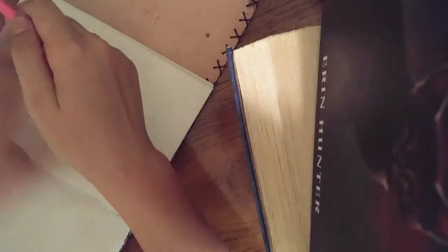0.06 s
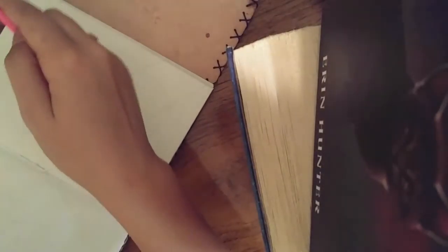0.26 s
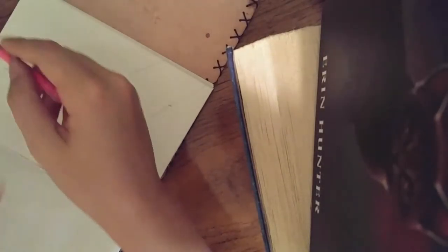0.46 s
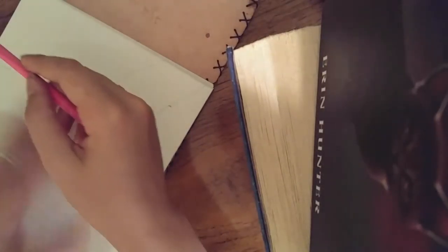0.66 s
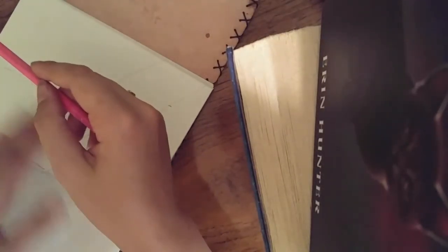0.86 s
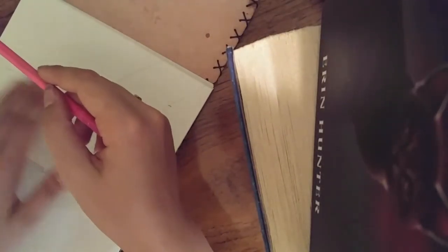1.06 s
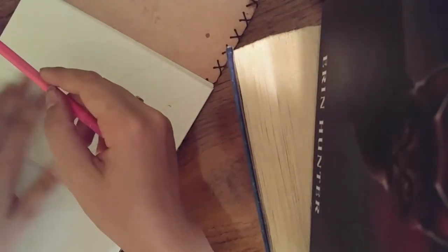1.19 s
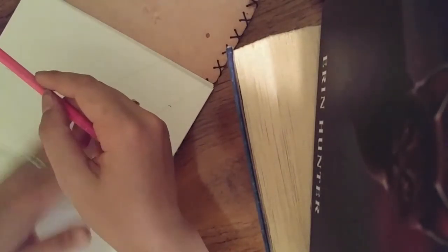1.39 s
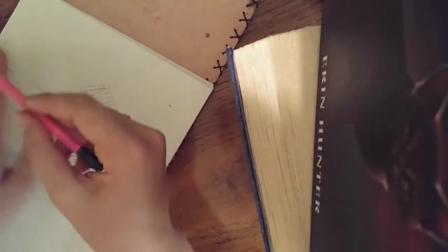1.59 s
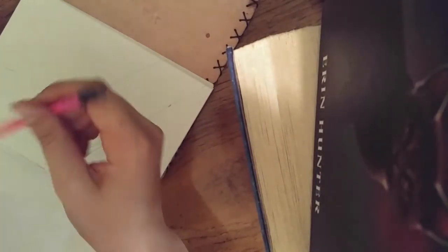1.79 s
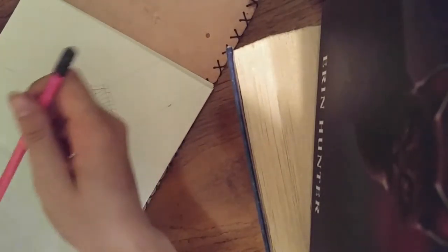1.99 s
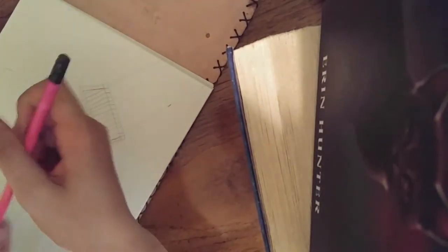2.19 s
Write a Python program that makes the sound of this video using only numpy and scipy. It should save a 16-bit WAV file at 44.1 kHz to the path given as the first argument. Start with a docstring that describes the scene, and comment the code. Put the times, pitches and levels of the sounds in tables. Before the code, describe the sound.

Close pencil sketching on paper: a few quick, scratchy strokes and soft taps.

```python
"""In a small quiet room, a pencil close by draws seven short strokes in a sketchbook on a wooden table.
The lead catches on the paper fibres, making a fine hiss that swells with the speed of the hand.
Where it lands it taps the page and thumps the table. The lead squeaks once, and the hand nudges
the book once. A low hum and a faint hiss lie underneath."""
import sys
import numpy as np
from scipy import signal
from scipy.fft import rfft, irfft
from scipy.io import wavfile
from scipy.ndimage import uniform_filter1d

SR = 44100
rng = np.random.default_rng(int(sys.argv[2]) if len(sys.argv) > 2 else 0)


def store_pcm(level_fs):
    """Save levels as 16-bit WAV."""
    pcm = np.round(np.clip(level_fs, -1, 1) * 32767).astype(np.int16)
    wavfile.write(sys.argv[1], SR, np.atleast_2d(pcm).T)


N = 99225

TOUCH_S, LIFT_S, CHATTER_S = 0.0016, 0.013, 0.0055
CHATTER_DB, BODY_DB = 0.5, -19
# Two bands of pencil rasp, and a narrow high ring near 10 kHz, probably the microphone's,
# varying in strength per stroke (centre [Hz], width [octaves])
RASP, BITE, HIGH_RING = (2400, 0.81), (4600, 0.44), (10050, 0.08)
# The hiss of lead on paper (frequency [Hz], level [dB])
LEAD_HISS = [(300, -50), (1200, -22.5), (2000, -12), (2600, -14), (3400, -9.5), (4500, -7), (5600, -6.5),
             (6500, -7.5), (8000, -5.5), (8900, -9), (9500, -3.5), (10150, -2), (10900, -4.5), (12500, -8),
             (15500, -10.5), (17000, -16)]
# The page drumming under the lead (frequency [Hz], level [dB])
PAGE_BODY = [(40, -24), (100, 1), (200, -15.5), (330, -11.5), (500, -24), (620, -4.5), (850, -2),
             (1100, -4.5), (1450, -9.5), (2200, -17.5), (5000, -31)]
# The pencil strokes (start [s], speeding up [s], slowing down [s], level [dB], change at touch [dB],
# change at lift [dB], brightness [dB/octave], page body [dB], rasp [dB], bite [dB], high ring [dB],
# left minus right [dB])
STROKES = [(0.1926, .034, 0.075, -30.5, -6, -7, 1.8, 0, -5, 0, 0.5, -1.5),
           (0.7143, 0.088, 0.025, -35.5, -10.5, -2, 1.5, 0.5, 0, 0.5, 1.5, -0.5),
           (1.082, 0.0061, 0.035, -60.5, 5, -2, 0, 15, 4, -1, 2.5, -1),
           (1.146, .030, 0.043, -51, -8.5, -4.5, 2.9, 11, 2.5, 0.5, 2.5, -1),
           (1.268, 0.059, 0.048, -49.5, -9.5, -9, 0.5, 8, 0.5, -1.5, 0.5, -1),
           (1.414, 0.076, 0.038, -40, -13.5, -8, -1.26, 2, -3, -1.5, 2, -1),
           (1.753, 0.026, 0.068, -34, -9, -3, 1.75, -2.5, -2, 2, 2, -1)]
def stroke(start, speed_up, slow_down, db, touch_db, lift_db, tilt_db,
           body_db, rasp_db, bite_db, high_ring_db, pan_db):
    """The lead rubs the paper: the hiss swells and eases with the hand, then dies as the lead lifts."""
    t = np.arange(SR // 3) / SR
    swell_db = touch_db * np.maximum(1 - t / speed_up, 0) ** 2
    ease_db = lift_db * np.clip((t - speed_up) / slow_down, 0, 1) ** 2
    contact = np.minimum(t / TOUCH_S, 1) * np.exp(-np.maximum(t - speed_up - slow_down, 0) / LIFT_S)
    chatter = unit(uniform_filter1d(rng.standard_normal(len(t)), int(CHATTER_S * SR)))
    hiss = colour(fibre_catches(len(t)), LEAD_HISS, tilt_db)
    for band, band_db in (RASP, rasp_db), (BITE, bite_db), (HIGH_RING, high_ring_db):
        hiss = bump(hiss, band, band_db)
    hiss = unit(hiss) * amp([[pan_db / 2], [-pan_db / 2]])
    body = amp(BODY_DB + body_db) * unit(colour(fibre_catches(len(t)), PAGE_BODY))
    return start, (hiss + body) * contact * amp(db + swell_db + ease_db + CHATTER_DB * chatter)


CATCHES_PER_S, CATCH_SPREAD_DB = 26000, 2.0
# How alike the pencil sounds on the left and right (frequency [Hz], likeness [0-1])
PENCIL_LIKENESS = [(100, 1), (400, 0.76), (700, 0.63), (1150, 0.56), (1450, .45), (2300, 0.93), (3100, .45),
                   (3750, 0.97), (4600, 0.42), (5600, 0.083), (8500, 0.022), (11000, 0.12), (14000, 0.66),
                   (16000, .3)]
def fibre_catches(size):
    """Paper fibres let go of the lead in a crowd of tiny, uneven clicks."""
    strength = amp(CATCH_SPREAD_DB * np.minimum(rng.exponential(1, size), 4))
    caught = rng.random(size) < CATCHES_PER_S / SR
    return pair(strength * caught * rng.standard_normal((2, size)), PENCIL_LIKENESS)


TICK_S, TAP_RISE_S, THUMP_RISE_S = 0.0064, 0.00083, 0.0016
PUFF_S, PUFF_DB = 0.005, 3
# The puff of the sheet being knocked flat (frequency [Hz], level [dB])
PAGE_PUFF = [(60, -4), (200, -1.5), (350, -20), (500, -23), (650, 0.5), (900, 6), (1150, -11), (1500, -10),
             (2300, -20.5), (4500, -8.5), (12000, -36)]
# The ringing tones of page and table (pitch [Hz], level [dB], time to fade by 60 dB [s])
PAGE_TONES = [(437.5, -12, 0.13), (616.5, -0.5, 0.056), (730, 1, 0.0081), (800, -5, 0.033),
              (883, -10, 0.056), (1090, -4, 0.021), (1169, -5, 0.072), (1315, -10, 0.04), (1910, -9, 0.043),
              (2346, -19, 0.041)]
TABLE_TONES = [(63.8, 0.5, 0.35), (105, 1, 0.24), (123.4, 3.5, 0.17), (163.7, -2.5, 0.33), (197, -2, 0.15),
               (227, -19.5, 0.19), (297, -23, 0.12)]
# The pencil's knocks (time [s], page tap [dB], table thump [dB], brightness [dB/octave], tick [dB])
TAPS = [(0.1916, -47.5, -59, 5, -42), (.205, -35.5, -34, 1.5, -55), (.299, -50.5, -82, 0, -35.5),
        (0.7156, -39.5, -55, 0, -48.5), (0.819, -47, -76, -0.5, -55), (1.085, -59, -84, -11, -57),
        (1.42, -53, -67, 3.5, -70), (1.512, -54, -82, 13, -63), (1.756, -40.5, -70, -1, -40),
        (1.7634, -27, -30.5, -4, -46)]
def tap(start, page_db, table_db, tilt_db, tick_db):
    """The tip hits with a tick, the sheet flattens with a puff, and page and table ring."""
    t = np.arange(SR // 2) / SR
    tick = unit(colour(fibre_catches(len(t)), LEAD_HISS)) * np.exp(-t / TICK_S)
    puff = unit(colour(fibre_catches(len(t)), PAGE_PUFF, tilt_db))
    puff *= np.exp(-t / PUFF_S) * np.minimum(t / TAP_RISE_S, 1)
    page = ring(PAGE_TONES, t, TAP_RISE_S, tilt_db) + amp(PUFF_DB) * puff
    thump = ring(TABLE_TONES, t, THUMP_RISE_S)
    return start, amp(tick_db) * tick + amp(page_db) * page + amp(table_db) * thump


def ring(tones, t, rise_s, tilt_db=0):
    """A struck object rings with several tones, each fading at its own pace."""
    hz, db, fade_s = np.transpose(tones)[:, :, None]
    gain = amp(db + tilt_db * np.log2(hz / hz[0]))
    waves = gain * np.exp(-np.log(1000) * t / fade_s) * np.sin(2 * np.pi * hz * t)
    return waves.sum(0) / np.linalg.norm(gain) * (1 - np.exp(-t / rise_s))


# The lead's one squeak (time [s], length [s], level [dB], starting pitch [Hz], rise [octaves])
SQUEAKS = [(0.238, 0.0118, -47, 1748, 0.24)]
def squeak(start, length, db, hz, octaves):
    """For a moment the lead sticks and slips, faster and faster."""
    progress = np.arange(0, length, 1 / SR) / length
    tone = np.sin(2 * np.pi * np.cumsum(hz * 2 ** (octaves * progress)) / SR)
    return start, amp(db) * np.sin(np.pi * progress) ** 2 * tone


# The hand settling on the book (time [s], level [dB], pitch [Hz])
NUDGES = [(0.763, -54.5, 62)]
def nudge(peak_time, db, hz, width_s=0.019):
    """A soft push of the hand rocks the table a few times."""
    t = np.arange(-SR // 8, SR // 8) / SR
    return peak_time + t[0], amp(db) * np.exp(-(t / width_s) ** 2) * np.sin(2 * np.pi * hz * t)


# How much louder the left side is (frequency [Hz], left minus right [dB])
LEFT_LOUDER = [(60, 1.8), (150, 1.2), (300, 5), (600, 0), (1100, 9.5), (2500, 6), (4300, 3), (6000, 6),
               (8400, 12.5), (10000, 13), (12000, 6), (15500, 8)]
# How far ahead the wave is on the left (frequency [Hz], head start [radians])
LEFT_SOONER = [(60, .02), (300, 0.13), (550, 0.48), (1150, 0.23), (1600, 0.43), (4000, 0.45), (5000, 0.9),
               (10000, .7), (14000, 1)]
def from_left(x, share=1):
    """Sound reaches the left microphone louder and sooner; share scales the loudness gap."""
    hz, sides = bins(x), np.array([[.5], [-.5]])
    gain = amp(share * sides * read(LEFT_LOUDER, hz)) * np.exp(1j * sides * read(LEFT_SOONER, hz))
    return irfft(rfft(x) * gain / np.linalg.norm(gain, axis=0), N)


LATE_DB, LATE_TIMES_LONGER = -24.5, 2.67
# How long the quick echoes last (frequency [Hz], time to fade by 60 dB [s])
ECHO_FADE = [(100, 0.18), (500, 0.22), (2000, 0.35), (6000, 0.27), (10000, 0.18), (16000, 0.21)]
# How loud the echoes are (frequency [Hz], level [dB])
ECHO_LEVEL = [(60, -25), (300, -3), (1000, -7.5), (4000, -7), (16000, 1)]
def room_echo(x):
    """Sound bounces quickly off the table and walls, then leaves a faint longer tail."""
    bounces = pair(rng.standard_normal((2, SR)), PENCIL_LIKENESS) * (np.arange(SR) > SR // 400)
    hz, t, spectrum = signal.stft(bounces, SR, nperseg=256)
    fall_db = -60 * t / read(ECHO_FADE, hz)[:, None]
    fade = amp(fall_db) + amp(LATE_DB + fall_db / LATE_TIMES_LONGER)
    tail = signal.istft(spectrum * fade, SR, nperseg=256)[1]
    echoes = signal.fftconvolve(x, tail / np.linalg.norm(tail[0]), axes=1)[:, :N]
    return colour(echoes, ECHO_LEVEL)


# The tones of the hum (pitch [Hz], base level [dB], loudness wobble [0-1], pitch drift [Hz])
HUM_TONES = [(55.5, -73, 0.8, 2.7), (114.6, -70.5, 0.4, 5.04), (202, -86.5, 0.7, 6),
             (290, -88.5, 0.2, 1.86)]
# The rise and fall of the whole hum (time [s], level change [dB])
HUM_SWELL = [(0, 6), (0.101, -1), (.43, 8.5), (.49, -3.5), (0.582, 2.5), (.95, 5.5), (1.06, -5.5), (1.2, 8),
             (1.33, 1.5), (1.4, 5), (1.62, 1), (2.25, 2.5)]
def hum():
    """Four low tones waver in loudness and pitch."""
    tones = np.zeros(N)
    for hz, db, depth, drift in HUM_TONES:
        wobble = 1 + depth * waver()
        pitch = hz + drift * waver()
        tones += amp(db) * unit(wobble * np.sin(2 * np.pi * np.cumsum(pitch) / SR))
    return tones * amp(np.interp(np.arange(N) / SR, *np.transpose(HUM_SWELL)))


# The hiss of the room (frequency [Hz], level [dB])
AIR_HISS = [(25, -23), (45, -17), (60, -7.5), (85, -4), (120, -6), (150, -10), (229, -16), (317, -19),
            (400, -18), (490, -28.5), (624, -16), (887, -15), (1100, -19), (1740, -24), (4500, -26),
            (7510, -30), (14400, -28), (16000, -33)]
# How alike that hiss is on the left and right (frequency [Hz], likeness [0-1])
AIR_LIKENESS = [(100, 0.84), (400, 0.42), (1000, 0.47), (3000, 0.34), (15000, 0.26)]
def room_air(db=-67):
    """The air in the room makes a faint, steady noise."""
    return amp(db) * unit(colour(pair(rng.standard_normal((2, N)), AIR_LIKENESS), AIR_HISS))


def waver(speed_hz=6.17):
    """A slow random wander with a typical size of 1."""
    noise = rng.standard_normal(N)
    return unit(irfft(rfft(noise) * np.exp(-(bins(noise) / speed_hz) ** 2), N))


def amp(db):
    """Turns decibels into a number to multiply by."""
    return 10 ** (np.asarray(db) / 20)


def unit(x):
    """Scales a sound to an average power of 1."""
    return x / np.sqrt(np.mean(x ** 2) + 1e-20)


def bins(x):
    """Lists the frequencies that make up x."""
    return np.fft.rfftfreq(x.shape[-1], 1 / SR)


def read(points, hz):
    """Reads between the rows of a table, spacing frequencies by octaves."""
    row_hz, value = np.transpose(points)
    return np.interp(np.log(hz + 1), np.log(row_hz + 1), value)


def colour(x, points, tilt_db=0):
    """Shapes lows and highs by a table, adding tilt_db for each octave up."""
    hz = bins(x)
    octaves = np.log2(np.maximum(hz / points[0][0], 1))
    return irfft(rfft(x) * amp(read(points, hz) + tilt_db * octaves), x.shape[-1])


def bump(x, band, db):
    """Turns one band of frequencies up or down."""
    hz, octaves = band
    hill = np.exp(-(np.log2((bins(x) + 1) / hz) / octaves) ** 2)
    return irfft(rfft(x) * amp(db * hill), x.shape[-1])


def pair(x, likeness):
    """Blends two unrelated sounds into a partly alike left and right."""
    left, other = rfft(x)
    alike = np.clip(read(likeness, bins(x)), -1, 1)
    right = alike * left + np.sqrt(1 - alike ** 2) * other
    return irfft(np.array([left, right]), x.shape[-1])


def add(mix, start, sound):
    """Lays a sound into the mix at a start time in seconds."""
    part = mix[:, max(round(start * SR), 0):][:, :sound.shape[-1]]
    part += sound[..., :part.shape[1]]


def scene():
    """The pencil works a little to the left; the room answers from all round."""
    pencil = np.zeros((2, N))
    for source, table in (stroke, STROKES), (tap, TAPS), (nudge, NUDGES), (squeak, SQUEAKS):
        for row in table:
            add(pencil, *source(*row))
    return from_left(pencil) + from_left(room_echo(pencil), share=0.2) + room_air() + hum()


def record(dry):
    """The recorder cuts the deepest rumble and the highest treble."""
    low_hz, high_hz = 42, 15850
    thinned = signal.sosfilt(signal.butter(5, low_hz, "highpass", fs=SR, output="sos"), dry)
    treble_cut = signal.firwin(511, high_hz, window=("kaiser", 8), fs=SR)
    return signal.oaconvolve(thinned, treble_cut[None], "same")


dry = scene()
out = record(dry)
store_pcm(out)
```